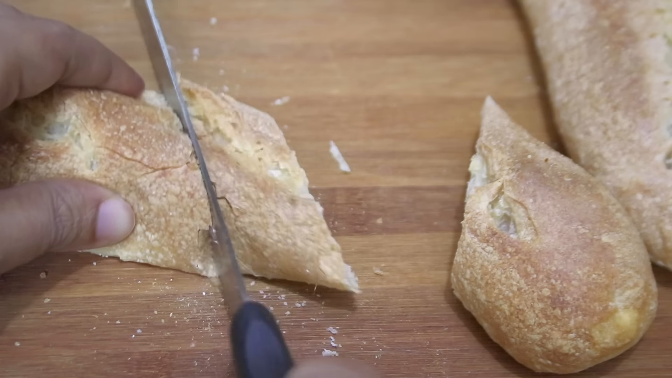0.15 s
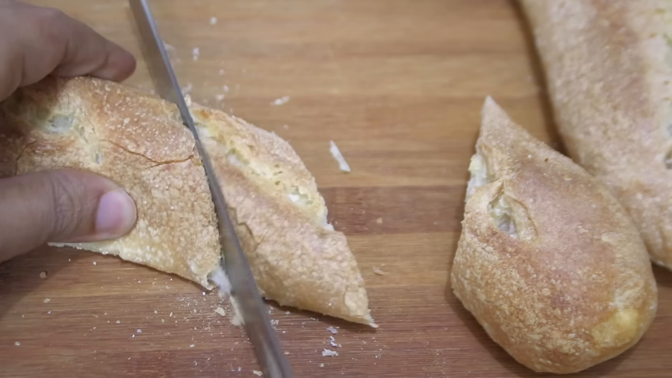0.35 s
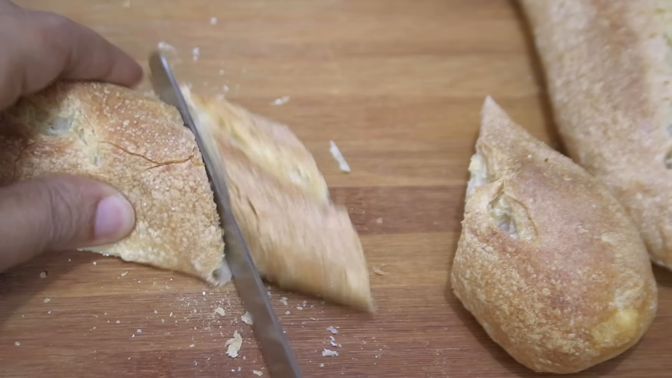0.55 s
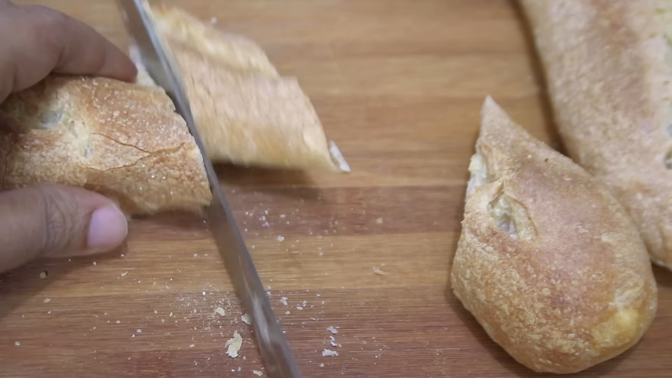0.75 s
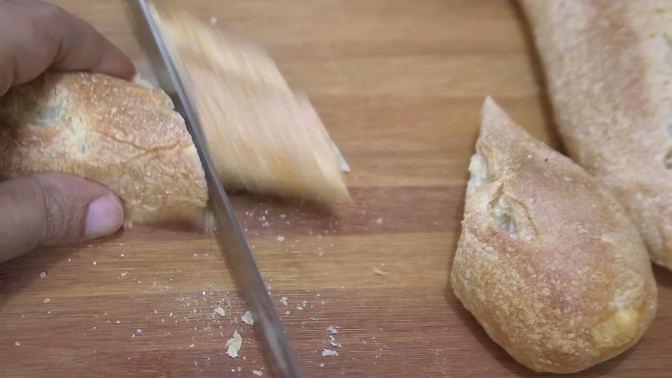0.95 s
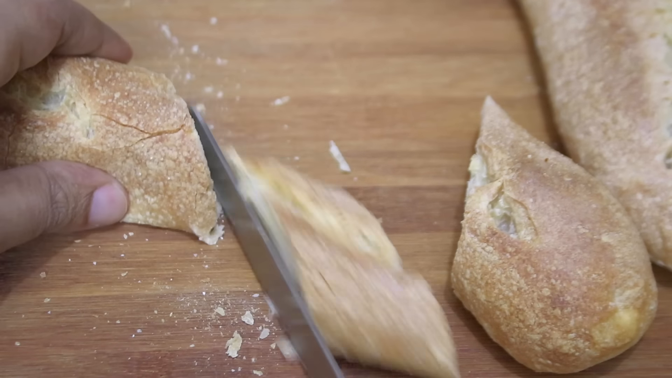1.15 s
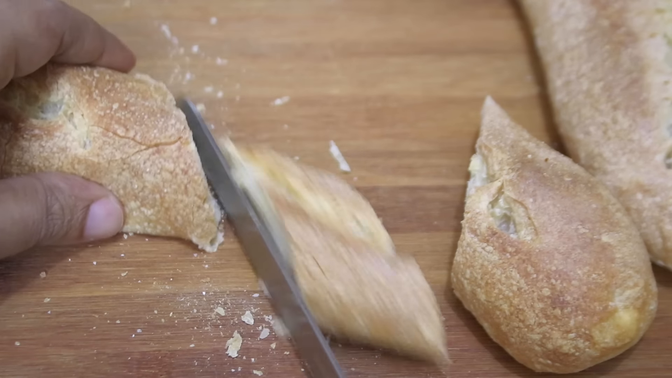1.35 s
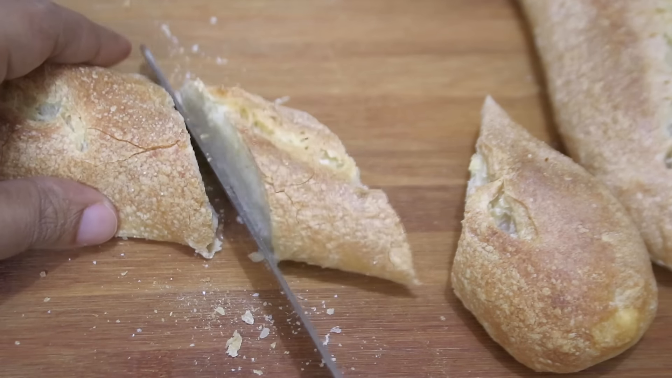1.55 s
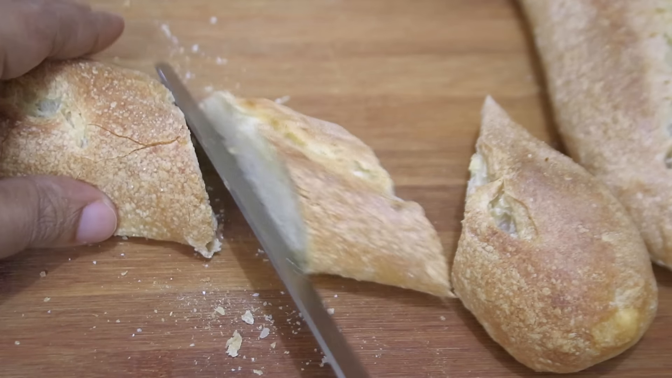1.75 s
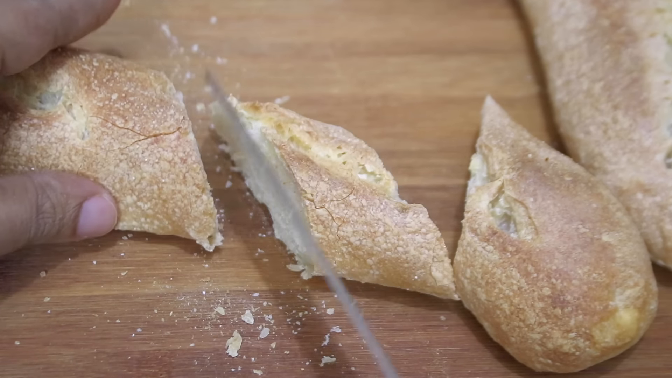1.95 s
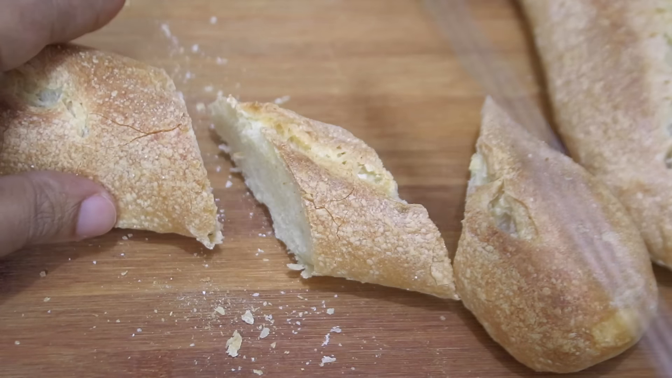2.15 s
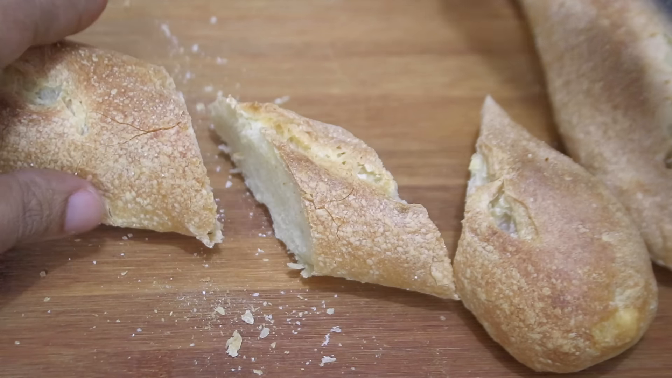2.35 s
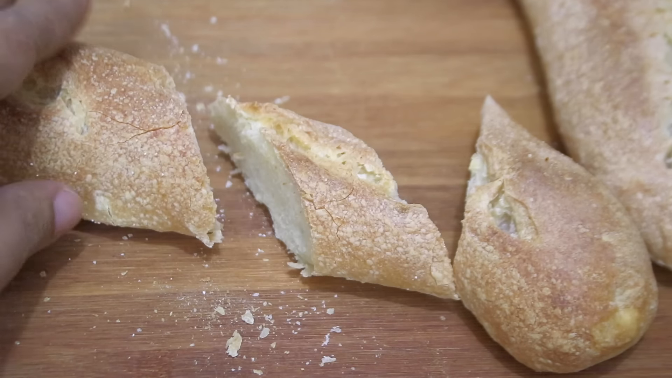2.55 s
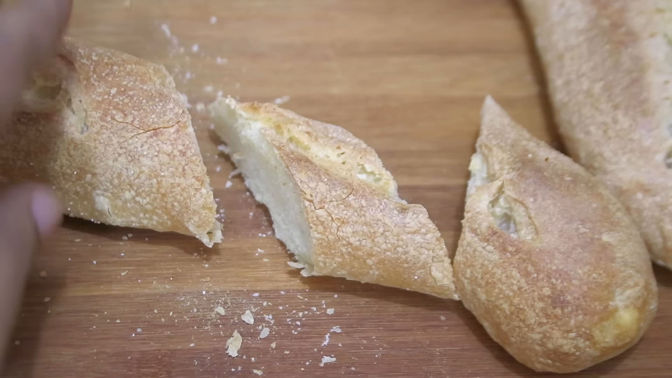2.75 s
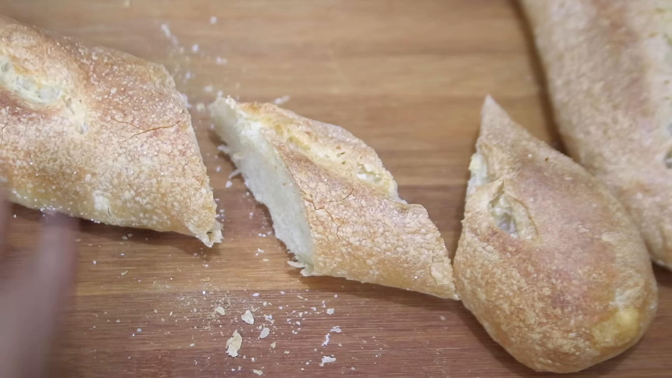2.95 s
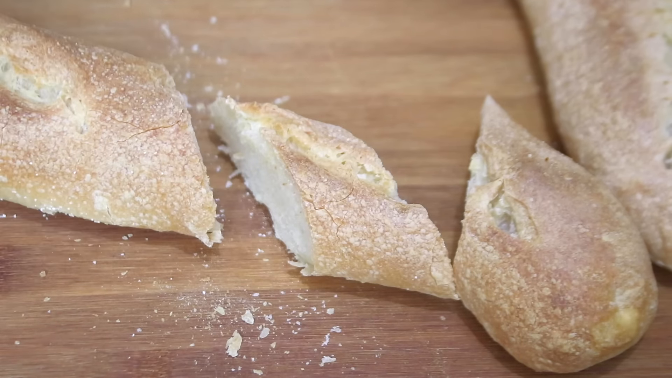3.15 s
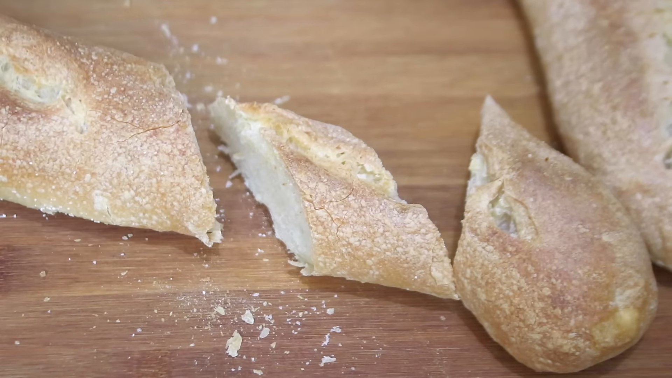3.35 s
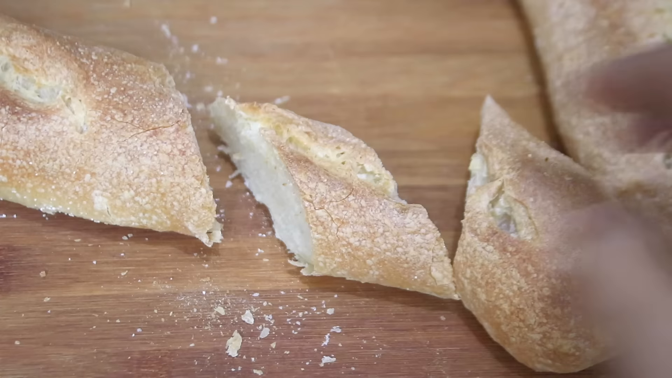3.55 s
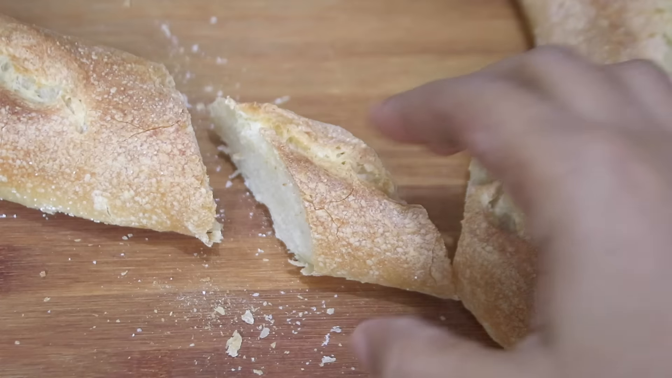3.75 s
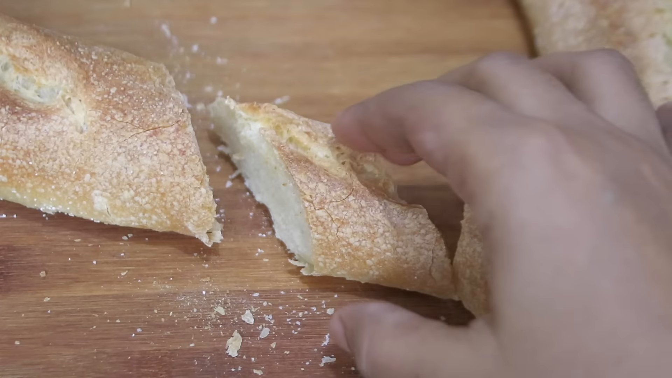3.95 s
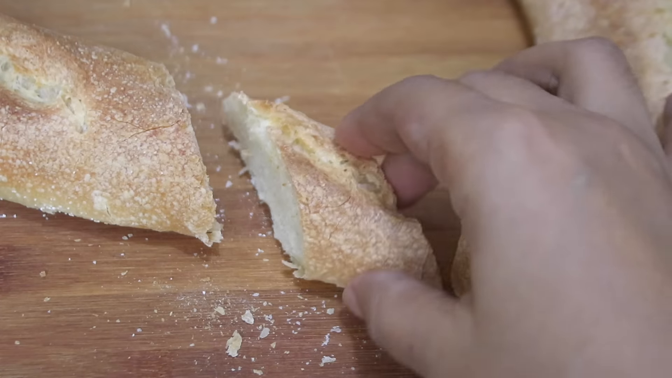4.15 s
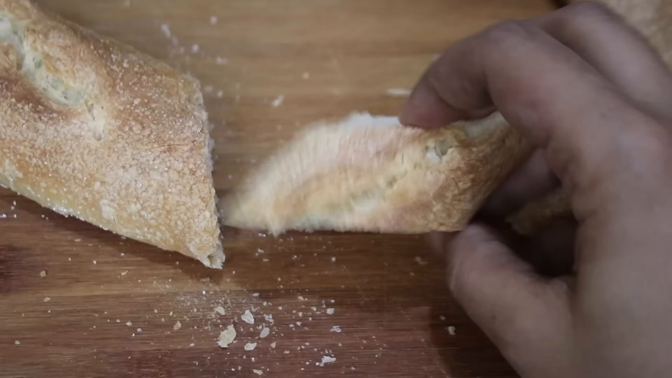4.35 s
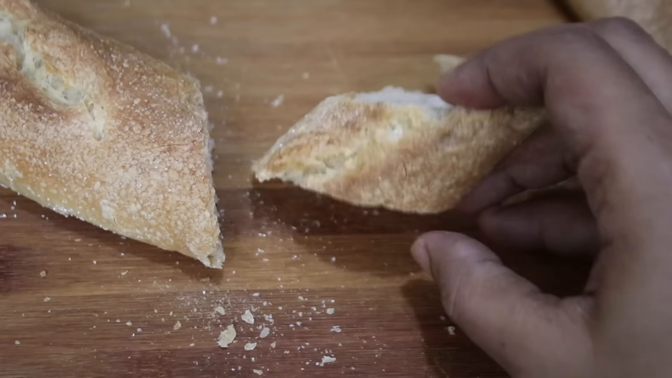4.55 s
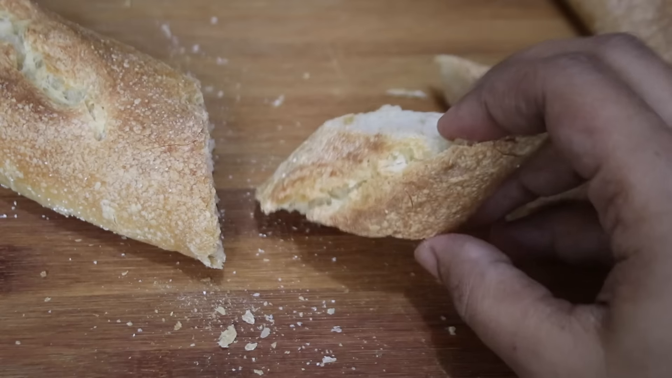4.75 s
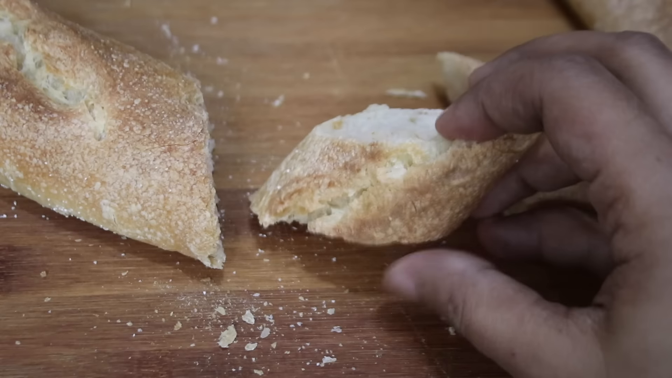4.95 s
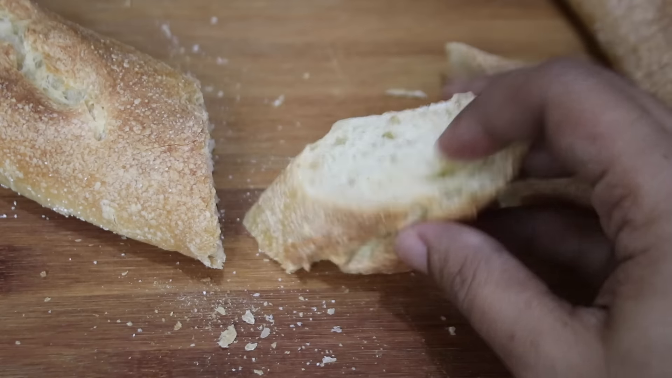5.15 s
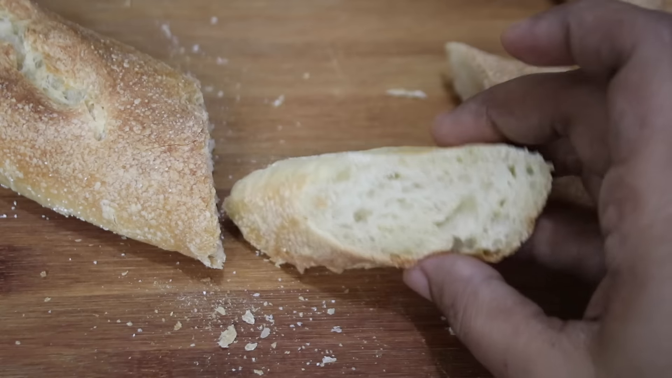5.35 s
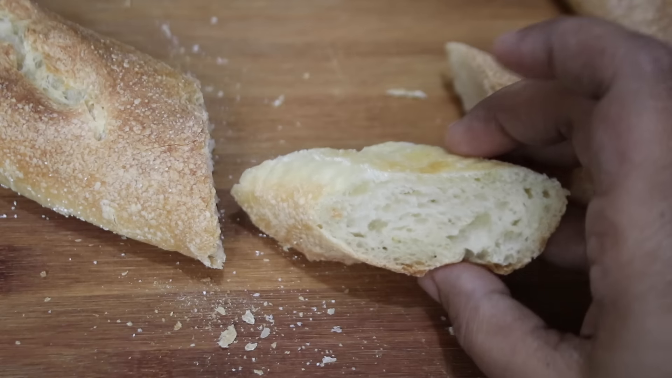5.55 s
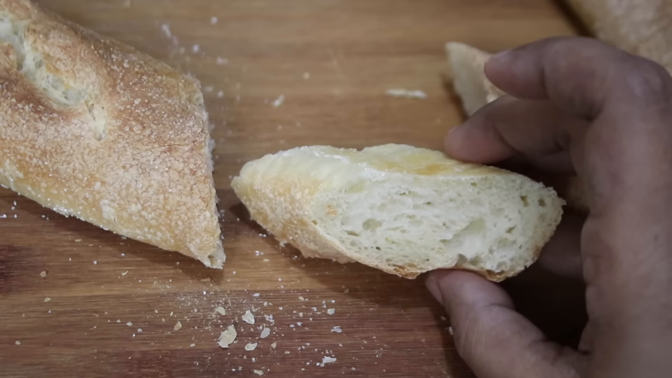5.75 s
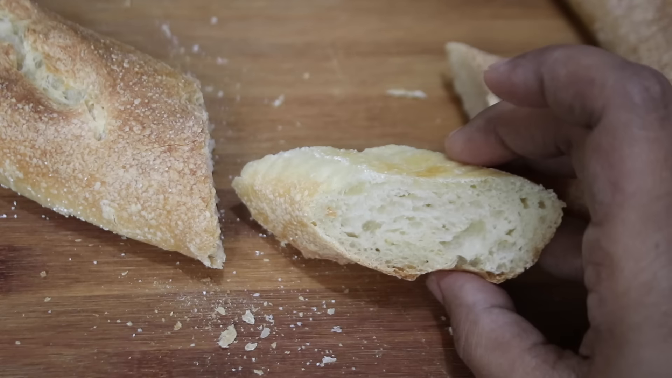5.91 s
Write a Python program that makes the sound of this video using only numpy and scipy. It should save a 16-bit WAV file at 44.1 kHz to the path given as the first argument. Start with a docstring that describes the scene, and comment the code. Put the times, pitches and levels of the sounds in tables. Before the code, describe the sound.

A serrated knife saws through a crusty loaf in five quick strokes, the crust crackling and the wooden board rasping and knocking beneath it. After a pause, the knife is put down with a sharp metallic clack, a brief rattle and a duller knock. Fingers then brush and turn the slice with faint dry ticks. The sound is close, in a small kitchen with low appliance hum and soft hiss.

```python
"""Sawing a crusty loaf

A serrated knife saws five strokes through bread on a wooden board, close to a two-port microphone.
Its teeth shake the board and break the crust. The knife is laid down in two knocks, rocking between
them, then fingers turn the slice. A small hard kitchen answers, over appliance hum and distant hiss."""
import sys
import numpy as np
from scipy import signal
from scipy.fft import rfft, irfft, next_fast_len
from scipy.io import wavfile
from scipy.ndimage import uniform_filter1d

SR = 44100
rng = np.random.default_rng(int(sys.argv[2]) if len(sys.argv) > 2 else 0)


def wrap_up_sound(samples):
    """Save the sound to the file named by the first command line argument, as 16-bit audio."""
    columns = np.atleast_2d(samples).T
    # keep every value between -1 and 1, then stretch to whole-number steps
    tamed = np.clip(columns, -1, 1)
    steps = np.round(tamed * 32767).astype(np.int16)
    wavfile.write(sys.argv[1], SR, steps)


N = 268110


def undb(db):
    """Decibels to gain."""
    return 10 ** (np.asarray(db) / 20)


def unit(x):
    """Scale to rms 1."""
    return x / np.sqrt(np.mean(x ** 2))


def envelopes(table):
    """One gain curve for each dB column after the time column; silent outside the table."""
    times, *columns = np.transpose(table)
    return [undb(np.interp(np.arange(N) / SR, times, db, left=-120, right=-120)) for db in columns]


def swells(rows):
    """Summed gain of gestures, each 20 dB down one rise before and one fall after its peak."""
    t = np.arange(N) / SR
    return sum(undb(db - 20 * np.where(t < peak_s, (peak_s - t) / rise_s, (t - peak_s) / fall_s))
               for peak_s, db, rise_s, fall_s in rows)


def shape(x, gain):
    """Filter by a gain function of frequency."""
    size = next_fast_len(N)
    hz = np.arange(size // 2 + 1) * SR / size + 1e-3
    return irfft(rfft(x, size) * gain(hz), size)[..., :N]


def on_log(hz, table):
    """Read (frequency, value) points on a log axis."""
    points_hz, values = np.transpose(table)
    return np.interp(np.log(hz), np.log(points_hz), values)


def band(x, lo_hz, hi_hz):
    """Causal band-pass."""
    return signal.sosfilt(signal.butter(2, [lo_hz, hi_hz], "band", fs=SR, output="sos"), x)


def ring(force, modes):
    """Decaying modes driven by a force; a unit blow peaks near 1, and a small body sends out no bass."""
    t = np.arange(SR // 4) / SR
    body = sum((-1) ** k * undb(db) * np.sin(2 * np.pi * hz * t) * 1000 ** (-t / t60)
               for k, (hz, db, t60) in enumerate(modes))
    body = band(body, .65 * modes[0][0], 12000)
    return signal.fftconvolve(force, body / np.abs(body).max())[:N]


def grains(per_s, scatter_db):
    """Random tiny impacts: many small, a few large, none huge."""
    hit = rng.random(N) < per_s / SR
    return hit * rng.choice([-1., 1.], N) * undb(scatter_db * np.minimum(rng.exponential(size=N), 4))


def wander(rate_hz):
    """Smooth random drift, rms 1."""
    hold = int(SR / rate_hz)
    steps = np.repeat(rng.standard_normal(N // hold + 1), hold)
    return unit(uniform_filter1d(steps, hold)[:N])


def blows(times_s, db):
    """Impulses at given times."""
    force = np.zeros(N)
    np.add.at(force, (np.asarray(times_s) * SR).astype(int), undb(db))
    return force


def burst(force, t60_s):
    """Each impulse becomes a spray of noise."""
    t = np.arange(SR // 5) / SR
    return signal.fftconvolve(force, 1000 ** (-t / t60_s))[:N] * rng.standard_normal(N)


def ports(x, lag_s, pan_db):
    """Place a source: the left port hears it lag_s later and pan_db louder than the right."""
    side = np.array([[1], [-1]])
    return shape(x, lambda hz: np.exp(-1j * np.pi * hz * lag_s * side)) * undb(pan_db * side / 2)


# Tone colour of the hiss: frequency_hz, relative_db
HISS_SPECTRUM = [(12, -20), (20, -4.5), (53, -10.5), (98, -8), (146, -9.5), (182, -7.5), (248, -9.5),
                 (399, -7), (574, -12), (1290, -12.5), (1960, -23), (4670, -36), (9950, -32.5),
                 (14700, -41), (16000, -50)]
# How alike left and right are in diffuse sound: frequency_hz, correlation
STEREO_LIKENESS = [(30, 1), (130, 0.84), (290, 0.85), (640, 0.6), (1400, 0.066), (12000, 0.026)]


def distant_hiss():
    """A smooth, gently drifting bed of noise, centred in the bass and wide in the treble."""
    def noise(sign):
        return shape(rng.standard_normal(N), lambda hz: undb(on_log(hz, HISS_SPECTRUM))
                     * np.sqrt(1 + sign * on_log(hz, STEREO_LIKENESS)))
    mid, side = noise(1), noise(-1)
    return unit(np.array([mid + side, mid - side])) * undb(-46.5 + 0.37 * wander(rate_hz=2.66))


# The two hum lines: pitch_hz, width_hz
HUM_LINES = [(99, 10.3), (184, 22.3)]
# Their level rides: time_s, low_line_db, high_line_db
HUM_LEVELS = [(0, -39, -41), (.29, -47.5, -53.5), (.6, -43, -50), (.91, -37, -50.5), (1.1, -41.5, -52.5),
              (1.3, -38, -49), (1.5, -46, -50), (1.83, -46, -62), (2.3, -52.5, -54.5), (2.68, -49.5, -61.5),
              (3, -55.5, -45.5), (3.22, -45, -50), (3.47, -57, -55), (3.81, -45, -59), (4.23, -45, -51.5),
              (4.35, -55, -49.5), (4.96, -44.5, -48), (5.45, -48, -50), (5.8, -40, -56), (6.08, -47.5, -54)]


def appliance_hum():
    """Two narrow bands of noise waver, a little left of centre."""
    hum = 0
    for (hz, width_hz), level in zip(HUM_LINES, envelopes(HUM_LEVELS)):
        noise = rng.standard_normal(N) + 0.084 * rng.standard_normal((2, N))
        hum = hum + level * unit(band(noise, hz - width_hz / 2, hz + width_hz / 2))
    return hum * undb([[.6], [-.6]])


# The wooden board's modes: pitch_hz, relative_db, t60_s
BOARD_MODES = [(237, -11, 0.029), (318, -8.5, 0.038), (442, -11, 0.095), (680.6, -2, 0.052),
               (771, -6, 0.033), (1011.5, 1.5, 0.035), (1100, -3.5, 0.089), (1198.6, 4, 0.046),
               (1313, -32, .04), (1589, -14.5, 0.13), (1748, -2.5, 0.038), (2195, -3, 0.0088),
               (2594, -10, 0.028), (3305, -10.5, 0.014)]
LOW_MODES, MIDDLE_MODES, UPPER_MODES = BOARD_MODES[:3], BOARD_MODES[3:5], BOARD_MODES[5:]
# One list a stroke, the last the blade sliding out:
# time_s, upper_modes_db, middle_modes_db, crust_treble_db
STROKES = [
    [(0, -31, -33, -29), (.02, -28, -36.5, -29), (.085, -41, -37, -36.5), (.105, -24.5, -23, -29),
     (.13, -21, -22.5, -26.5), (.152, -26, -22, -34.5), (.19, -35, -38, -46.5), (.245, -59, -61, -63)],
    [(.25, -51, -62, -55), (.274, -40, -49, -44), (.382, -48, -49, -44), (.415, -46, -45, -42.5),
     (.432, -11, -35, -44), (.45, -34, -39, -39), (.516, -48, -47, -51), (.58, -73, -61, -66)],
    [(.585, -57, -62, -64), (.619, -33, -41, -40.5), (.69, -31.5, -36, -35.5), (.712, -25, -29.5, -32.5),
     (.736, -31, -36, -24), (.75, -27.5, -37, -31.5), (.797, -28, -34.5, -35), (.869, -33.5, -37, -34.5),
     (.905, -37, -34.5, -43.5), (.945, -51, -51, -61)],
    [(.95, -46, -48, -46.5), (.99, -29, -29.5, -33.5), (1.035, -22, -27, -30), (1.1, -30, -39, -36.5),
     (1.118, -30, -27, -35.5), (1.128, -17, -17.5, -33.5), (1.16, -15.5, -26.5, -35.5),
     (1.254, -25.5, -36, -40.5), (1.285, -34.5, -45, -43.5), (1.315, -55, -55, -63)],
    [(1.33, -56, -57, -58), (1.352, -29, -47, -46), (1.398, -24, -33.5, -39), (1.448, -23.5, -30, -38),
     (1.482, -22, -22, -44), (1.518, -31, -30, -45.5), (1.576, -44, -54, -53.5), (1.62, -61, -62, -70)],
    [(1.625, -58, -62, -63), (1.699, -48.5, -73, -63), (1.735, -55, -70, -65), (1.829, -47.5, -69, -56),
     (1.95, -71, -71, -70)],
]
# Weight of the board's low modes in each stroke: start_s, against_upper_modes_db
STROKE_WEIGHT = [(0, -8.5), (.25, -4), (.585, -10), (.95, -11), (1.32, -9.5), (1.625, -7.5)]
# Tone colour of the crackle as the microphone hears it, with a dip near 5 kHz: frequency_hz, relative_db
CRACKLE_AT_MIC = [(880, -41), (1500, -3.5), (1710, -6), (2720, -7.5), (3310, -8), (4830, -15.5),
                  (6500, -12), (10600, -16), (16000, -25)]


def sawing(build_up_s=0.028):
    """Teeth catch unevenly: the board rings, its low modes lagging, and the crust shatters."""
    upper, middle, crackle = envelopes(sum(STROKES, []))
    start_s, weight_db = np.transpose(STROKE_WEIGHT)
    stroke = np.searchsorted(start_s * SR, np.arange(N), "right") - 1
    pole = np.exp(-1 / (build_up_s * SR))
    low = signal.lfilter([1 - pole], [1, -pole], upper * undb(weight_db[stroke]))
    teeth = grains(per_s=2500, scatter_db=2.17) * undb(2.13 * wander(rate_hz=60))
    board = sum(unit(ring(teeth, modes)) * level
                for modes, level in [(UPPER_MODES, upper), (MIDDLE_MODES, middle), (LOW_MODES, low)])
    # fractures all along the cut: each port hears some of them better
    fractures = grains(4000, 3.0) + 0.63 * np.array([grains(5000, 1.8), grains(5000, 3.1)])
    fractures *= undb(1.9 * wander(rate_hz=74))
    crust = shape(fractures, lambda hz: undb(on_log(hz, CRACKLE_AT_MIC)))
    crust /= np.std(band(crust, 4000, 12000))  # the treble sets the level
    return board + crust * crackle


# The loaf shifts under the blade: peak_s, level_db, rise_s, fall_s
LURCHES = [(.01, -33, .02, .15), (.09, -36, .04, .05), (.44, -29, 0.094, 0.1)]


def loaf_thumps():
    """The loaf lurches on the board with soft bass thumps."""
    noise = rng.standard_normal(N) + 0.16 * rng.standard_normal((2, N))
    return unit(band(band(noise, 65, 110), 56, 116)) * swells(LURCHES)


# Single snaps of crust and crumbs: start_s, level_db, brightness_db
CRUST_SNAPS = [(0.0154, -21.5, 7.5), (0.039, -24.5, 7.5), (0.1058, -22.5, 4), (0.2816, -22, -20),
               (0.3262, -31, -4), (0.402, -29, -15), (0.4753, -22, -17), (0.634, -18, -18),
               (0.7266, -17.5, -3), (0.7297, -14.5, -6), (0.7378, -10.5, -3.5), (0.756, -29, -3),
               (0.842, -17, -4.5), (0.9815, -25.5, 1), (1.257, -24, -17), (1.263, -15, -9.5),
               (1.5549, -22.5, -24), (1.631, -40.5, -5), (1.6473, -33, -18), (1.6813, -37.5, -11),
               (1.707, -38, -9), (1.7424, -43, -20), (1.784, -36, -11), (2.467, -41, -9), (4.136, -38, -14),
               (4.152, -27, -19), (4.1558, -26, -19), (4.175, -35, -13), (4.1853, -38, -16),
               (4.1974, -30, -16), (4.2472, -42, 2), (4.4992, -45, -14), (4.6163, -27.5, 2),
               (4.6247, -37, -4), (4.6967, -42, -14), (4.782, -42, -17), (4.8608, -40.5, -4),
               (4.9373, -41, -13), (5.331, -44, -20), (5.485, -44, -1), (5.509, -46, 0)]


def crust_snaps(into_board_db=-7.5, pan_spread_db=2):
    """Crust breaks in sharp ticks with a dull and a bright part; each also rings the board."""
    ticks = np.zeros((2, N))
    t = np.arange(SR // 25) / SR
    for start_s, db, bright_db in CRUST_SNAPS:
        spray = undb(-8.5) * rng.standard_normal((2, len(t))) * 1000 ** (-t / 0.014)
        crack = (t == 0) + spray
        tick = undb(13.5) * band(crack, 1500, 3820) + undb(bright_db + 15) * band(crack, 6900, 11250)
        pan_db = pan_spread_db * rng.standard_normal() * np.array([[.5], [-.5]])
        start = int(start_s * SR)
        ticks[:, start:start + len(t)] += undb(db + pan_db) * tick
    times_s, levels_db, _ = np.transpose(CRUST_SNAPS)
    return ticks + ring(blows(times_s, levels_db + into_board_db), UPPER_MODES)


# The blade's modes: pitch_hz, relative_db, t60_s
BLADE_MODES = [(1195, 0, 0.042), (1587, -7, 0.043), (1733, 2, 0.049), (2120, -3, 0.051),
               (2410, -1.5, 0.032), (3124, -3.5, 0.023), (3660, -26, 0.02117), (6760, -7, 0.0082),
               (7040, -16, .015)]
# Knife meeting wood, in the cut and when laid down: start_s, blade_db, board_db, click_db, worktop_db
KNIFE_KNOCKS = [(0.101, -30, -10.5, -20, -40), (0.428, -25, -14.5, -40, -11.5),
                (.431, -32, -11.5, -41, -13.5), (.698, -41, -17, -19, -38), (.966, -40, -26, -30, -40),
                (1.126, -39, -16.5, -30, -38), (1.351, -40, -26.5, -35, -40), (1.412, -37, -16, -35, -40),
                (1.46, -35, -15.5, -37, -40), (1.485, -33, -15, -35, -40), (2.898, -1.5, -43, -8, -33),
                (2.903, -2.5, -45, -12, -26), (2.904, -20, -25, -17, -37), (2.930, -12, -30, -38, -42),
                (2.952, -14, -28, -40, -33), (2.971, -18, -22.5, -41, -41), (3.2202, -28, -10, -24, -3),
                (3.2234, -16.5, -21, -37, -8.5), (3.229, -28, -26, -41, -29), (3.269, -40, -24, -50, -34)]
# The knife rocks before it lies flat: peak_s, level_db, rise_s, fall_s
KNIFE_ROCKS = [(2.93, -30, .02, 0.18), (3.07, -38.5, 0.093, 0.12), (3.165, -44.5, 0.052, .05)]


def knife_knocks():
    """Knocks ring blade, board and worktop; the rocking knife chatters in its lower modes."""
    times_s, *levels_db = np.transpose(KNIFE_KNOCKS)
    on_blade, on_board, on_click, on_worktop = (blows(times_s, db) for db in levels_db)
    chatter = sum(undb(db) * unit(ring(grains(147.2, 1.4), [(hz, db, t60)]))
                  for hz, db, t60 in BLADE_MODES[:3])
    grit = unit(band(grains(4000, 1.3), 1300, 10000))
    rocking = (unit(chatter) + undb(-11.5) * grit) * swells(KNIFE_ROCKS)
    blade = ring(band(on_blade, 177, 5900), BLADE_MODES)
    board = ring(band(on_board, 177, 5900), BOARD_MODES)
    # the click, and a worktop with too many modes to tell apart: noises that differ at the two ports
    click = [band(band(burst(on_click, t60_s=0.016), 1300, 8600), 1300, 12000) for _ in range(2)]
    clatter = [band(burst(on_worktop, 0.036) + undb(-13) * burst(on_worktop, 0.18), 470, 2600)
               for _ in range(2)]
    return ports(blade + board + rocking, lag_s=2.5e-5, pan_db=-1.2) + click + np.array(clatter)


# Fingertips brushing crust: peak_s, scrape_db, hiss_over_scrape_db, rise_s, fall_s
FINGER_BRUSHES = [(3.9, -60, 0, .9, 0.8), (4.153, -48.5, -5, .03, 0.07), (4.27, -54, -5, .02, 0.06),
                  (4.617, -47.5, 0, .002, 0.02), (4.862, -64, 3, .03, .015), (5.13, -63, -10, .25, 0.2),
                  (5.327, -52.5, -7, 0.033, 0.04), (5.495, -52.5, -5, .03, 0.1)]


def finger_rustle():
    """Skin drags on dry crust: a dull scrape that rings the board, and an airy hiss."""
    dull = swells([(s, db, rise, fall) for s, db, _, rise, fall in FINGER_BRUSHES])
    airy = swells([(s, db + hiss_db, rise, fall) for s, db, hiss_db, rise, fall in FINGER_BRUSHES])
    friction = grains(per_s=4000, scatter_db=2.0)
    scrape = unit(band(band(friction, 1100, 3600), 900, 3900))
    board = undb(2.0) * unit(ring(friction, UPPER_MODES))
    hiss = unit(band(grains(6600, 1.7), 5800, 10300))
    return (scrape + board) * dull + hiss * airy


# Bands of the room's tail: centre_hz, t60_s, level_before_tilt_db
REVERB_BANDS = [(151, 0.78, -12.5), (606, 0.25, -9.5), (2450, 0.31, -7), (8900, 0.25, -9)]


def kitchen_reverb(near):
    """Walls return a diffuse tail, different at each port, longest in the bass."""
    t = np.arange(SR // 2) / SR
    tail = 0
    for hz, t60_s, db in REVERB_BANDS:
        shared, own = rng.standard_normal(len(t)), rng.standard_normal((2, len(t)))
        likeness = on_log(hz, STEREO_LIKENESS)
        noise = np.sqrt(likeness) * shared + np.sqrt(1 - likeness) * own
        decay = band(noise, hz / 2, hz * 2) * 1000 ** (-t / t60_s)
        tilt = np.sqrt(hz / REVERB_BANDS[-1][0])  # 3 dB an octave
        tail = tail + undb(db) * tilt * decay / np.sqrt(np.sum(decay ** 2) / 2)
    fade_in = np.clip(t / 0.002, 0, 1)
    return signal.fftconvolve(near.mean(0)[None], tail * fade_in, axes=1)[:, :N]


def scene():
    """Close-up bread and knife, their room, and the background bed."""
    near = ports(sawing() + loaf_thumps(), lag_s=1.5e-5, pan_db=-0.6)
    near += knife_knocks()
    near += ports(finger_rustle(), lag_s=-3.4e-5, pan_db=-0.8)
    near += crust_snaps()
    return near + kitchen_reverb(near) + distant_hiss() + appliance_hum()


def record(dry):
    """The recorder clips at full scale and cuts the top."""
    low_pass = signal.ellip(10, .2, 80, 15850, fs=SR, output="sos")
    return signal.sosfilt(low_pass, np.clip(dry, -1, 1))


dry = scene()
out = record(dry)
wrap_up_sound(out)
```